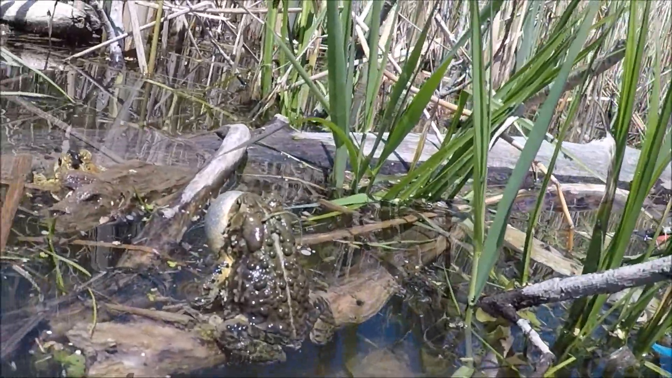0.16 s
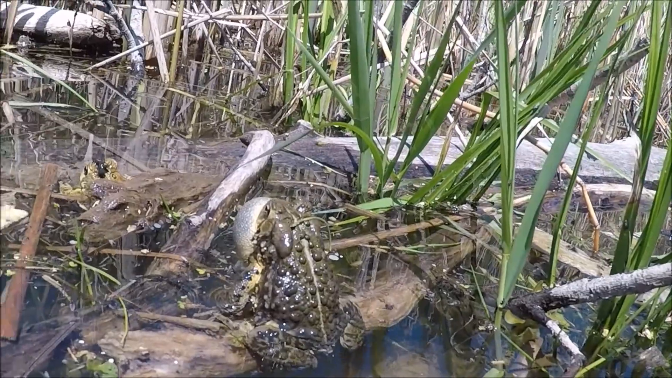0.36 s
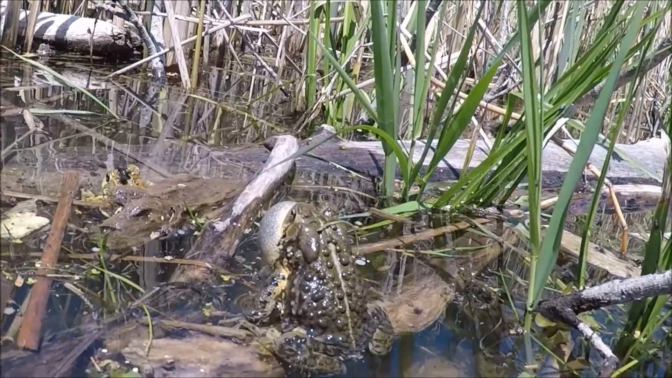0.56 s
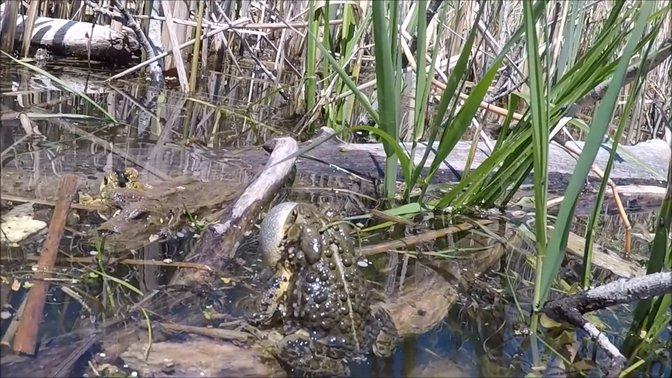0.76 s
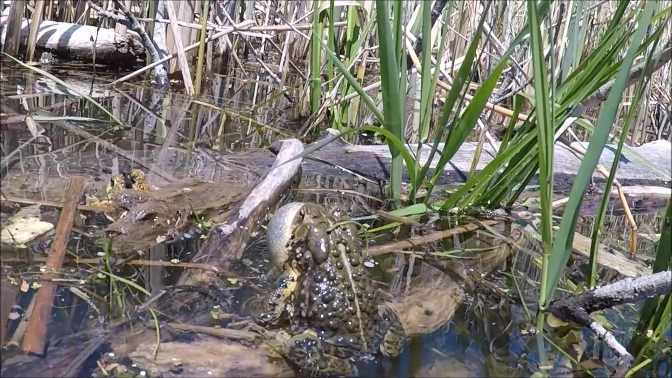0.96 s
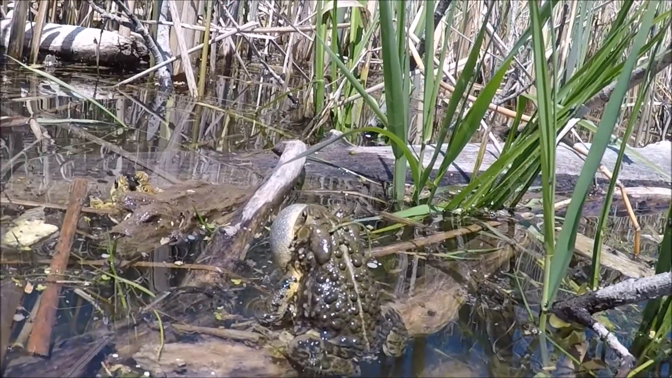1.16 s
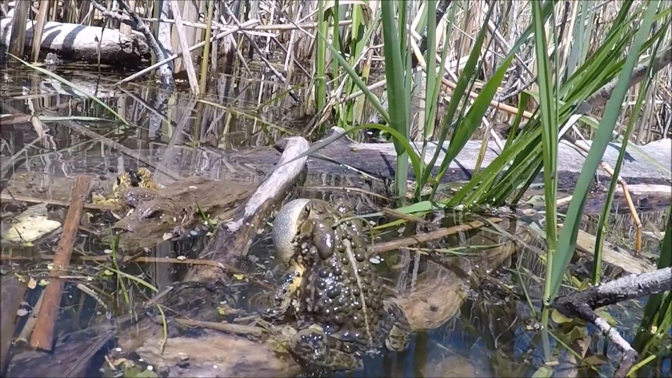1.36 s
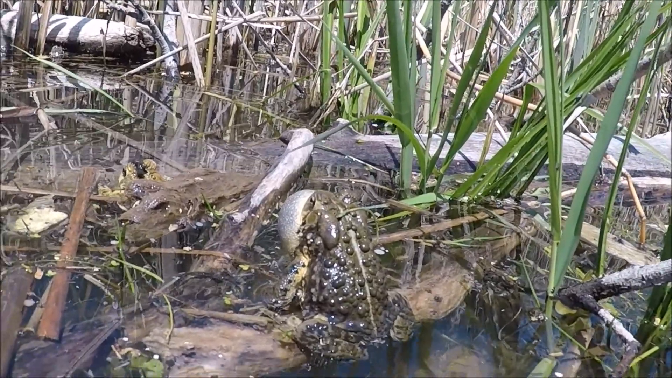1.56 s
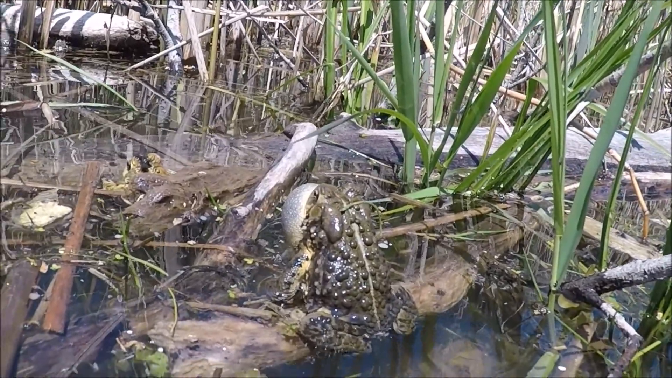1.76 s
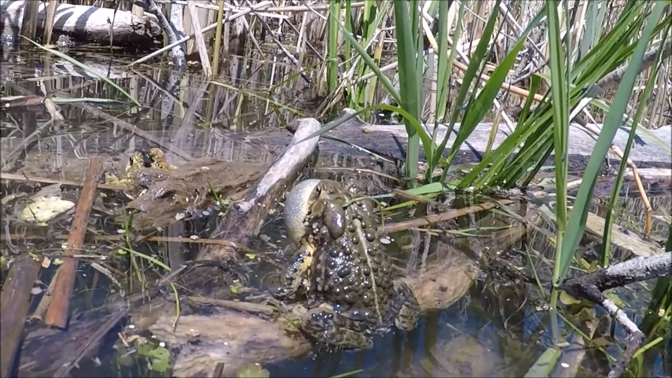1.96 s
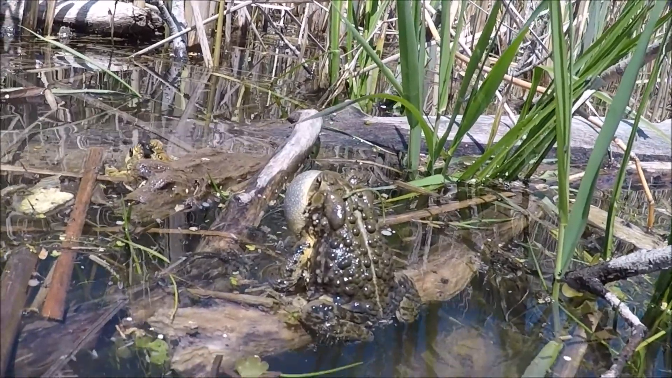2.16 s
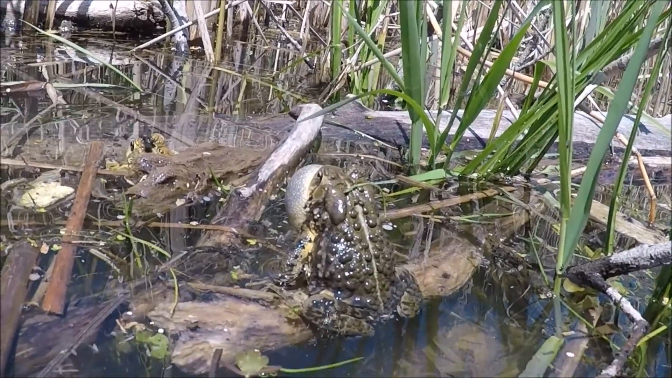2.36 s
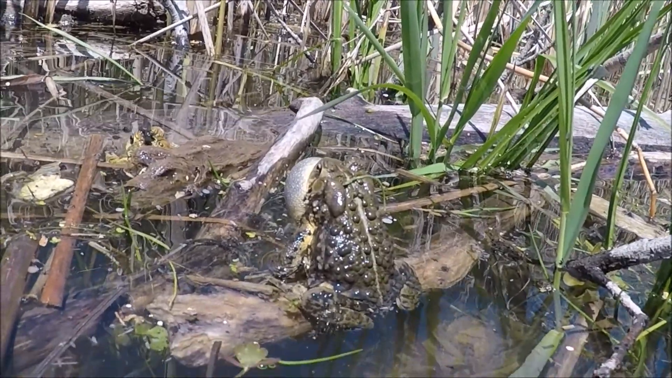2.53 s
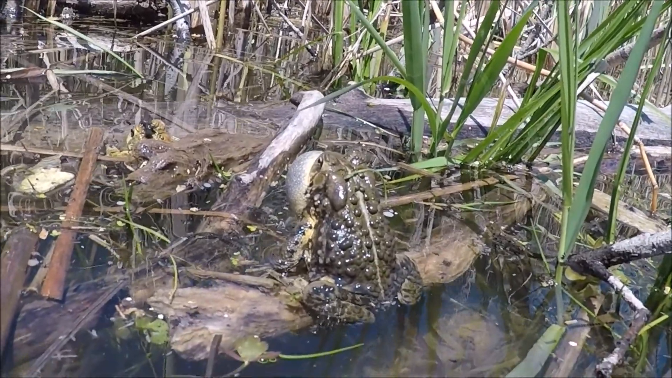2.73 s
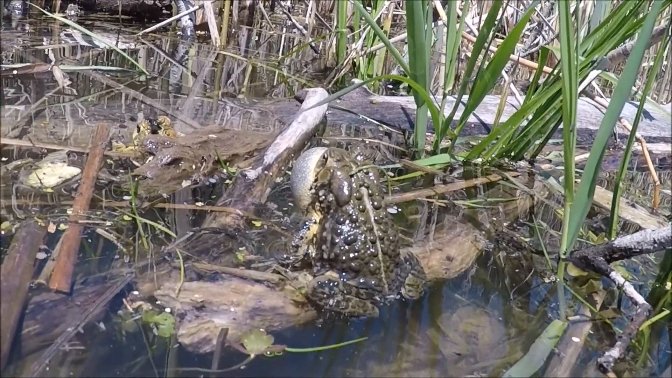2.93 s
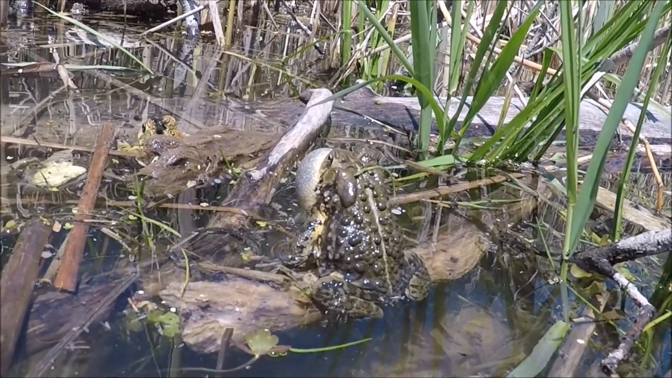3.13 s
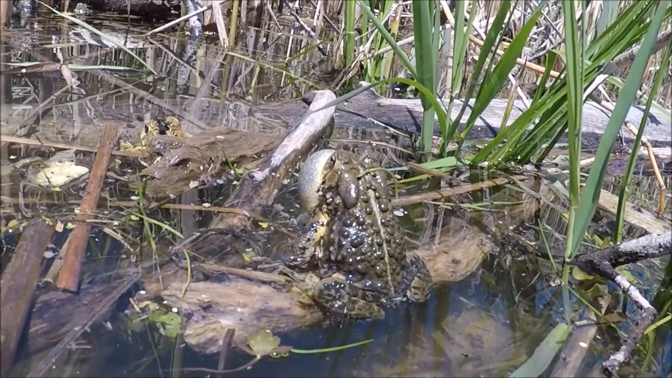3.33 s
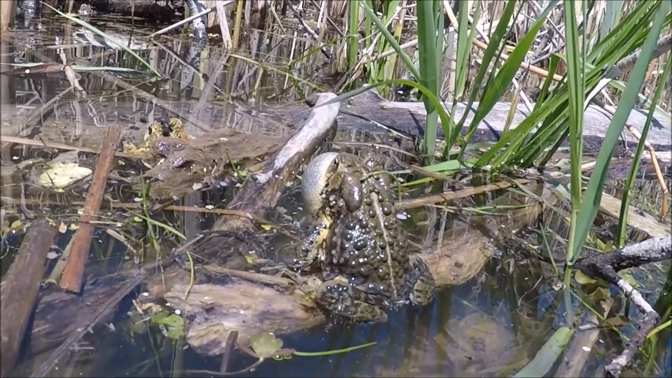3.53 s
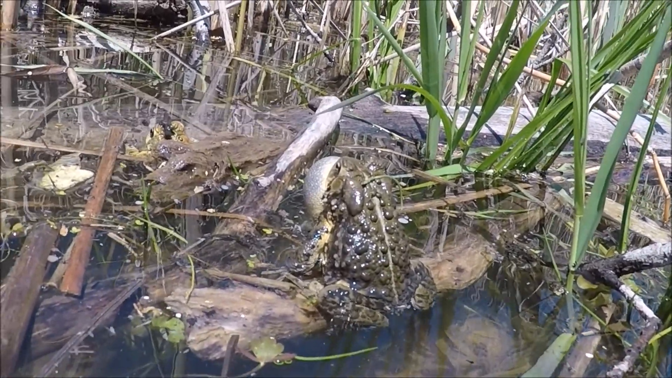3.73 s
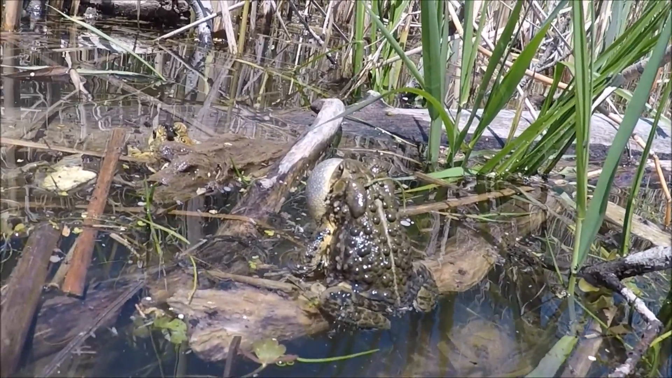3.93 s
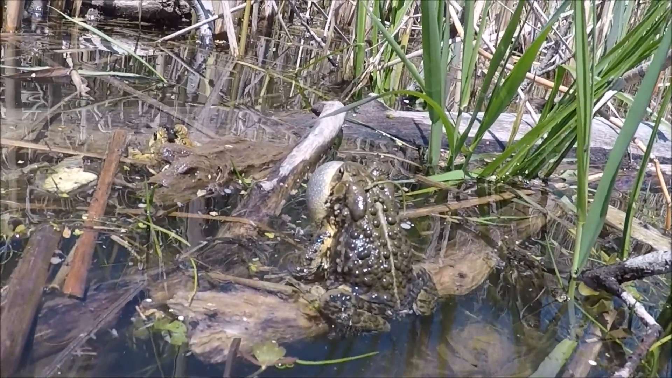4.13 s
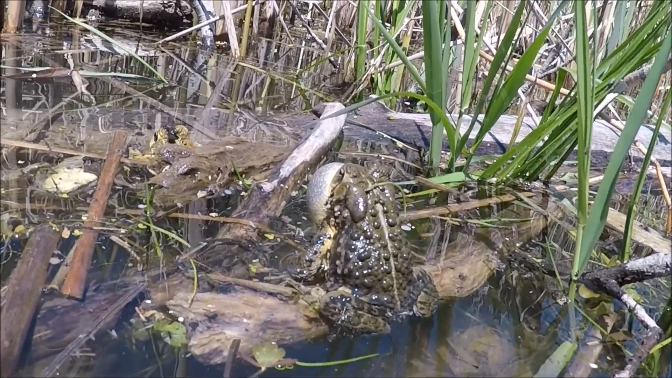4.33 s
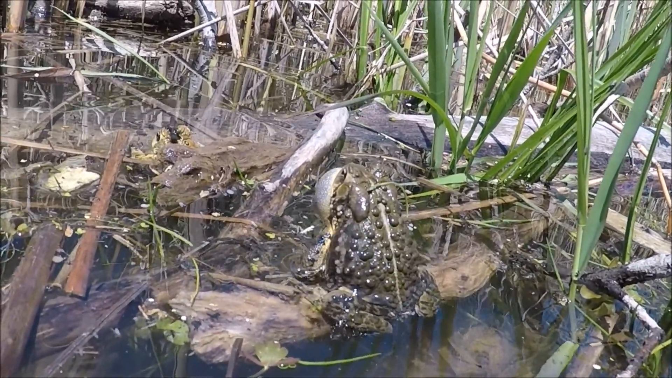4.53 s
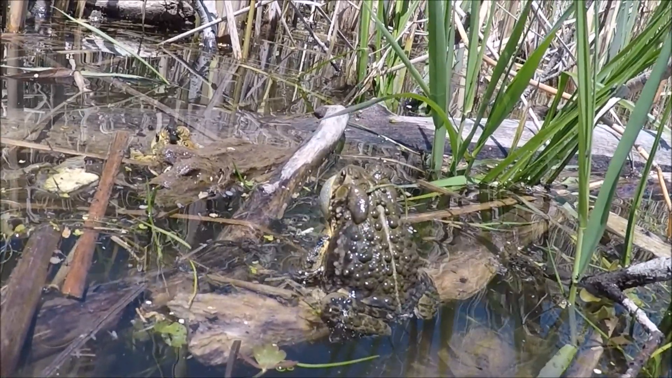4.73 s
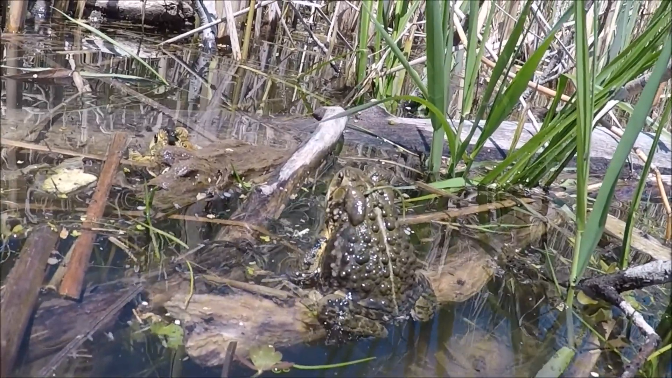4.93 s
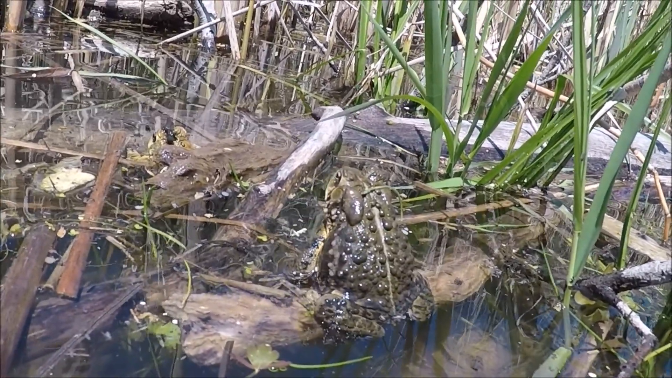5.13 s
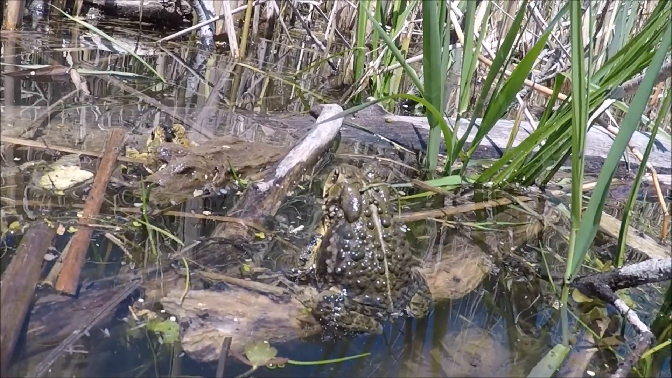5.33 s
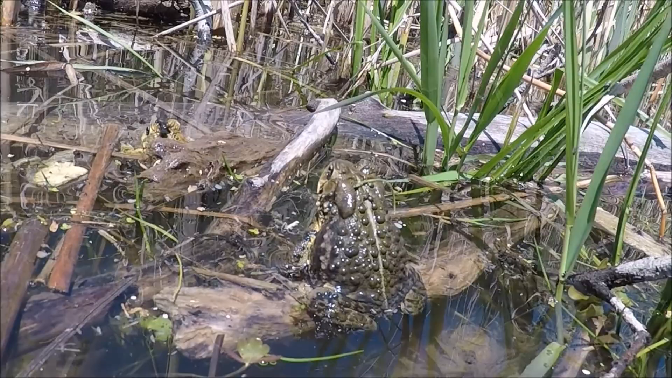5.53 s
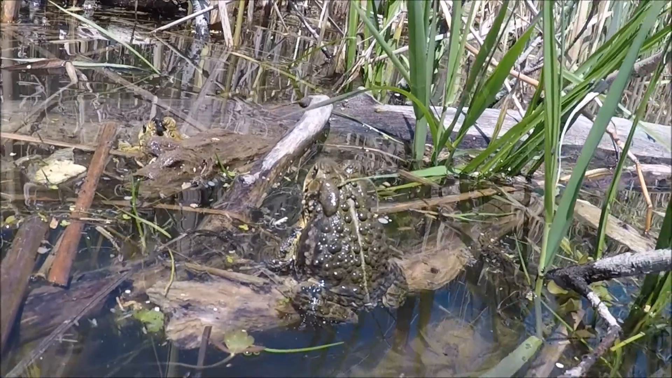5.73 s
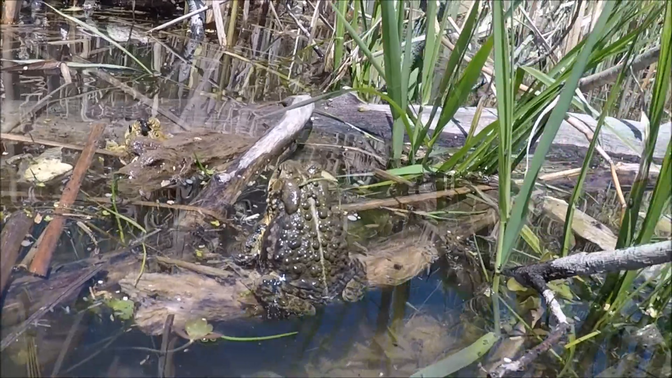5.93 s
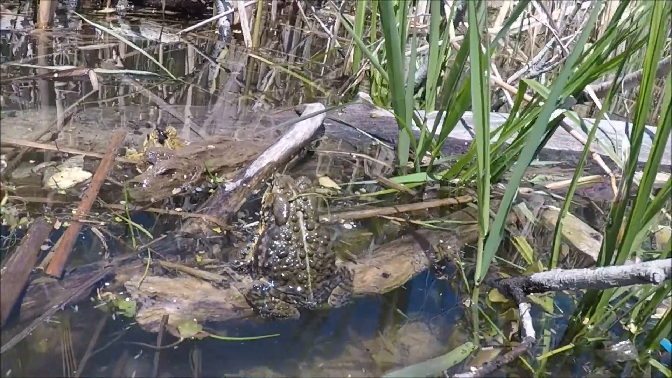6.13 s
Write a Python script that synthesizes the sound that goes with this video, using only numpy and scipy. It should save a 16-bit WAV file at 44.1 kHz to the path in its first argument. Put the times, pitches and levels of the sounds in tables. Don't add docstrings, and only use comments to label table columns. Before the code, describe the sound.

A toad trills loudly and steadily up close at a reedy pond, stops abruptly, and softer overlapping trills from neighbours swell behind amid wind knocks.

```python
import sys
import numpy as np
from scipy import signal
from scipy.fft import rfft, irfft, next_fast_len
from scipy.io import wavfile
from scipy.ndimage import uniform_filter1d, map_coordinates

SR = 44100
rng = np.random.default_rng(int(sys.argv[2]) if len(sys.argv) > 2 else 0)


def rack_gain(trim_db):
    fader = np.asarray(trim_db, float)
    return 10 ** (fader / 20)


def store_pcm(level_fs):
    pcm = np.round(np.clip(level_fs, -1, 1) * 32767).astype(np.int16)
    wavfile.write(sys.argv[1], SR, np.atleast_2d(pcm).T)


N = 276948

ROUND, FLAT = 1.04, .37
SILENT_S = 4.45


def unit(x):
    return x / np.sqrt(np.mean(x ** 2) + 1e-20)


def along(points, hz):
    f, v = np.transpose(points)
    return np.interp(np.log(hz + 1), np.log(f + 1), v)


def curves(rows):
    s, *cols = np.transpose(rows)
    return [np.interp(np.arange(N) / SR, s, c) for c in cols]


def wobble(rate):
    knots = rng.standard_normal(int(N * rate / SR) + 4)
    return map_coordinates(knots, [np.arange(N) * rate / SR])


def filtered(x, response):
    m = next_fast_len(N + SR // 2)
    return irfft(rfft(x, m) * response(np.fft.rfftfreq(m, 1 / SR)), m)[..., :N]


def rush(spectrum, alike, patchy_db):
    z = signal.stft(rng.standard_normal((2, N)), nperseg=512)[2]
    field = uniform_filter1d(rng.standard_normal(z.shape[1:]), size=6, axis=0)
    field = uniform_filter1d(field, size=10, axis=1)
    pair = signal.istft(z * rack_gain(patchy_db * unit(field)), nperseg=512)[1][:, :N]
    turn = np.arccos(np.clip(alike, -1, 1)) / 2
    coloured = filtered(pair, lambda hz: rack_gain(along(spectrum, hz) - 220 * (hz < spectrum[0][0])))
    mid, side = coloured * [[np.cos(turn)], [np.sin(turn)]]
    return unit(np.array([mid + side, mid - side]))


def placed(starts, shape, size):
    first = np.ceil(starts * SR).astype(int)[:, None] + np.arange(size)
    keep = (first >= 0) & (first < N)
    return np.bincount(first[keep], shape(first / SR - starts[:, None])[keep], N)


def reeds(x):
    # (frequency [Hz], 60 dB decay time [s])
    ring = [(500, 0.074), (1700, 0.15), (6000, 0.045)]
    hz, t, z = signal.stft(rng.standard_normal((2, SR // 4)), SR, nperseg=256)
    decay = rack_gain(-60 * t / along(ring, hz)[:, None])
    tail = signal.istft(z * decay, SR, nperseg=256)[1]
    tail = tail / np.linalg.norm(tail[0])
    return signal.fftconvolve(np.pad(x, (300, 0))[None], tail, axes=1)[:, :N]


def pulse(t, hz, length, overtones, fall):
    sag = .085
    hollow = .5
    part = np.clip(t / length, 0, 1)
    arch = np.sin(np.pi * part)
    turn = 2 * np.pi * hz * t
    sagging = 1 + sag * (.06 - part / 2)
    upper = 0
    for k, db, fade_db in overtones:
        level = rack_gain(db + fade_db * part) * (1 - hollow * (k == 2) * arch ** 4)
        upper = upper + level * np.sin(k * turn * sagging + k)
    return arch ** ROUND * np.sin(turn * (1 - fall * part / 2)) + arch ** FLAT * upper


def near_toad():
    # (time [s], pulse rate [per s])
    pace = [(0, 51.38), (0.3, 50.34), (0.9, 49.61), (1.6, 49.77), (2.3, 49.69), (2.9, 49.06), (3.3, 48.31),
            (3.6, 47.24), (3.85, 46.95), (4.1, 48.04), (4.25, 45.78), (4.32, 46.13), (4.36, 42.74),
            (4.45, 42.43)]
    # (multiple, left level [dB], right level [dB], fade over a puff [dB])
    overtones = [(2, -40, -31, 5), (3, -41, -36.5, -12), (4, -54, -38, -14), (5, -69, -56.5, -5.5),
                 (6, -70, -65.5, -12.5), (7, -79.5, -58.5, -3.5)]
    # (delay [ms], level [dB])
    water = [
        [(2.396, -17), (8.12, -24.5)],
        [(4.98, -6.7), (9.122, -17.5)],
    ]
    # (frequency [Hz], level [dB per Hz])
    breath = [(1800, -35.5), (2700, 3.5), (3800, -3.5), (4400, 0), (5500, -16.5), (7200, -6), (8300, -28),
              (10000, -42.5), (12500, -66.5)]
    puff_s = .0108
    first_s, jitter_s = -.0005, .0002
    rest_db, swing_db, settle_s = 5, 4.5, 0.18

    beats = np.cumsum(curves(pace)[0]) / SR
    count = np.arange(int(beats[round(SILENT_S * SR)]) + 1)
    chance = rng.standard_normal((len(count), 4))
    starts = np.interp(count, beats, np.arange(N) / SR) + first_s + jitter_s * chance[:, 0]
    level_db = 0.068 * chance[:, 1]
    pan_db = rest_db + swing_db * np.exp(-starts / settle_s) + 0.27 * chance[:, 3]
    hz = 1619 + 4 * chance[:, 2:3]
    air = rush(breath, alike=0.048, patchy_db=2.5)

    def breath_gate(t):
        return np.sin(np.pi * np.clip(t / puff_s, 0, 1)) ** FLAT * rack_gain(-5 * t / puff_s)

    def pop(t):
        return np.sin(2 * np.pi * 1050 * t) * rack_gain(-60 * t / 0.0076) * np.clip(t / 0.0015, 0, 1)

    ears = []
    # voice, opening pop, shutting pop, air [dB]
    levels = [(-5.5, -22, -40.0, -55), (-9.0, -16.5, -25.5, -49)]
    for ear, (voice_db, open_db, shut_db, air_db) in enumerate(levels):
        size = rack_gain(level_db + voice_db - ear * pan_db)[:, None]
        tones = [(row[0], row[1 + ear], row[-1]) for row in overtones]
        voice = placed(starts, lambda t: size * pulse(t, hz, puff_s, tones, fall=0.049), size=640)
        voice = voice + rack_gain(air_db) * placed(starts, breath_gate, size=640) * air[ear]
        pops = rack_gain(open_db) * placed(starts - .0008, pop, size=512)
        pops = pops + rack_gain(shut_db) * placed(starts + puff_s, pop, size=512)

        def echo(f):
            bounces = sum(rack_gain(db) * np.exp(-2j * np.pi * f * ms / 1000) for ms, db in water[ear])
            return 1 + bounces / (1 + (f / 8000) ** 4)

        ears.append(filtered(voice, echo) + filtered(pops, lambda f: 1 / (1 + (740 / (f + 1)) ** 6)))
    return np.array(ears) + rack_gain(-30.5) * reeds(ears[0])


def neighbours():
    # (pitch [Hz], pulse [ms], one pulse centre [s], left-right [dB], left lead [ms], octave [dB])
    toads = [
        (1795, 8, 5.104, 9.5, .32, -26),
        (1690, 9.5, 5.272, 6, .31, -35),
        (1570, 9.5, 5.2, 5, .31, -30),
    ]
    # (time [s], pulse rate of each toad in turn [per s] x 3)
    paces = [(4.5, 56.3, 52.4, 60), (5, 55.7, 51.8, 58), (5.25, 55.6, 52.5, 55.9), (5.7, 55.4, 53, 54.9),
             (6.2, 55.2, 53.5, 53.4)]
    # (level [dB], swell [dB])
    voices = [
        (-39, 5.5),
        (-42.5, 3),
        (-43.5, 8),
    ]
    swell_s, swell_lasts, scatter_db = 4.45, .5, .9

    out = np.zeros((2, N))
    swell = np.clip((np.arange(N) / SR - swell_s) / swell_lasts, 0, 1)
    for toad, rate, (level_db, swell_db) in zip(toads, curves(paces), voices):
        hz, ms, centre, pan_db, lead, octave_db = toad
        beats = np.cumsum(rate) / SR
        beats = beats - beats[round(centre * SR)]
        chance = rng.standard_normal((512, 3))[:int(beats[-1] - beats[0])]
        count = np.ceil(beats[0]) + np.arange(len(chance))
        centres = np.interp(count, beats, np.arange(N) / SR)
        starts = centres + .0003 * chance[:, 0] - ms / 2000
        tones = [(1.985, octave_db, -26.5), (3, octave_db - 24.5, -6), (4, octave_db - 24.5, -7.5)]
        size = rack_gain(scatter_db * chance[:, 1:2])
        pitch = hz + 12 * chance[:, 2:]
        train = placed(starts, lambda t: size * pulse(t, pitch, ms / 1000, tones, fall=0.056), size=512)
        voice = unit(train) * rack_gain(level_db + swell_db * swell)
        late = filtered(voice, lambda f: rack_gain(-pan_db) * np.exp(-2j * np.pi * f * lead / 1000))
        out += rack_gain(5) * np.array([voice, late]) + rack_gain(-16) * reeds(voice)
    return out


def pond():
    # (frequency [Hz], level [dB per Hz])
    bed = [(380, -39.5), (690, -38.5), (870, -33.5), (1090, -25), (1340, -18.5), (1620, -22), (1860, -27.5),
           (2070, -49), (2510, -40.5), (3400, -36), (3900, -58), (4350, -47.5), (8000, -53.5),
           (12500, -65.5), (13600, -110)]
    return rack_gain(-45.5 + 0.55 * wobble(6)) * rush(bed, alike=-0.27, patchy_db=-2.0)


def wind():
    # (time [s], level [dB])
    gusts = [(0, -36), (1, -39.5), (2.3, -40.5), (2.6, -43.5), (3.4, -45.5), (4.3, -48.5), (4.8, -56.5),
             (5.3, -45.5), (5.8, -44), (6.28, -39)]
    # (frequency [Hz], level [dB per Hz])
    buffet_tone = [(8, -25.5), (20, -0.5), (45, -2), (80, -9), (140, -42), (300, -120)]
    # (frequency [Hz], level [dB per Hz])
    rumble_tone = [(47, -28.5), (80, 4), (178, -0.5), (204, -6.5), (453, -22), (700, -63.5), (910, -58),
                   (1540, -120)]
    # (time [s], level [dB])
    engine = [(0, -37), (1.3, -42.5), (2.6, -46), (4.3, -47.5), (5.1, -45), (5.6, -42.5), (6.28, -44.5)]
    # (multiple, level [dB])
    harmonics = [(2, -8), (3, -18), (4, -25.5)]
    calm_db, base_db, grows = -46, -46.5, .3

    buffet_db, = curves(gusts)
    lumps = rack_gain(3.1 * np.array([wobble(10.0), wobble(7.2)]))
    buffet = unit(lumps * rush(buffet_tone, alike=-0.1, patchy_db=-0.5))
    buffet = rack_gain(buffet_db + 7) * buffet * rack_gain([[-2], [1.5]])

    rumble_db = base_db + grows * (buffet_db - calm_db)
    rumble = rack_gain(rumble_db + 2.0 + 0.64 * wobble(22))
    rumble = rumble * rush(rumble_tone, alike=0.0047, patchy_db=2.0)

    hum_db, = curves(engine)
    turn = 2 * np.pi * np.cumsum(85.45 + 1.2 * wobble(4.6)) / SR
    partials = [(1, 0)] + list(harmonics)
    hum = np.sqrt(2) * sum(rack_gain(db + 0.91 * wobble(3.5)) * np.sin(k * turn) for k, db in partials)
    return buffet + rack_gain([[-2.5], [1.5]]) * rumble + rack_gain(hum_db) * hum


def knocks():
    # (time [s], pitch [Hz], left level [dB], right level [dB], push 1 or pull -1)
    puffs = [(0.034, 202.6, -11.5, -2, -1), (0.103, 175.3, -13, -4.5, -1), (0.147, 103, -17, -28, 1),
             (0.364, 139.3, -16, -4, -1), (0.496, 115, -19, -25, 1), (1.462, 98, -30, -15, -1),
             (1.665, 98, -21, -25, -1), (2.379, 103.8, -11.5, -11, -1), (3.145, 100.8, -24, -20, 1),
             (3.978, 141, -26, -15.5, -1), (4.34, 117, -16, -23, -1), (5.181, 131, -16.5, -18.5, 1),
             (5.366, 113, -19, -23, -1), (5.482, 119, -13, -21.5, -1), (5.912, 148, -18, -9.5, 1),
             (5.917, 112.3, -37, -4, 1), (5.931, 59.7, -8.5, -28, 1), (6.041, 98, -8.5, -0.5, -1),
             (6.139, 126, -10, -3.5, 1), (6.264, 97.8, -9, -2.5, 1)]
    s, hz, left_db, right_db, sign = np.transpose(puffs)[..., None]

    def swing(t):
        turns = t * hz
        push = np.clip(turns / .25, 0, 1)
        return np.sin(2 * np.pi * turns ** .7) * push * np.exp(-.6 * turns ** 1.3)

    starts = (s - .3 / hz)[:, 0]
    sweep = ((left_db > right_db - 6) / hz / 4)[:, 0]
    ports = []
    for side, db, at in [(-0.67, left_db, starts - sweep), (0.8, right_db, starts)]:
        size = side * np.sign(sign) * rack_gain(db + 2.0)
        ports.append(placed(at, lambda t: size * swing(t), size=2048))
    return np.array(ports)


def scrape():
    # (level [dB], resonance from [Hz], to [Hz])
    top_db, from_hz, to_hz = (-48, 7100, 6300)
    # (start [s], end [s])
    start, end = (5.67, 5.89)
    # (time [s], peak level [dB], pitch [Hz], left-right [dB])
    touches = [(.03, -47, 7160, -3), (.08, -48, 8000, -10), (4.455, -38, 2370, 2.5), (5.513, -44, 6070, 1),
               (5.567, -42, 5760, -8), (5.71, -35, 2800, 8), (5.722, -30, 2880, 7), (5.919, -36, 6170, 3),
               (5.921, -40, 4900, 9), (5.917, -43, 7450, 3), (5.919, -19, 740, -3.5),
               (6.269, -42, 5900, -8), (6.27, -48, 8800, -8)]
    in_s, out_s, fade_db = .015, .04, 4

    t = np.arange(N) / SR
    part = np.clip((t - start) / (end - start), 0, 1)
    on = np.clip(np.minimum((t - start) / in_s, (end - t) / out_s), 0, 1)
    level_db = top_db - fade_db * part
    hz = from_hz + (to_hz - from_hz) * np.sqrt(part)
    slow = unit(filtered(rng.standard_normal((2, N)), lambda f: 1 / (1 + (f / 280) ** 2)))
    narrow = slow * np.sin(2 * np.pi * np.cumsum(hz) / SR)
    hiss = [(2000, -20), (4500, -4), (8000, 0), (11000, -9), (13000, -14), (14000, -70)]  # (Hz, dB)
    wide = rush(hiss, alike=.4, patchy_db=1.5)

    s, db, tick_hz, pan_db = np.transpose(touches)[..., None]

    def tick(t, side):
        ring = np.sin(2 * np.pi * tick_hz * t) * rack_gain(-60 * t / .011)
        return rack_gain(db + side * pan_db / 2) * ring * np.clip(t / 0.00033, 0, 1)

    ticks = [placed(s[:, 0], lambda t: tick(t, side), size=1024) for side in (1, -1)]
    return on * rack_gain(level_db + 2 * wobble(30)) * (narrow + rack_gain(-5) * wide) + ticks


def lift():
    jump_db, jump_s = 3, 0.022
    lift_db, lift_s = 11.5, 1
    duck_at, duck_db, duck_s = 5.92, 1.5, .1
    t = np.arange(N) / SR

    def rise(start, tau):
        return 1 - np.exp(-np.clip(t - start, 0, None) / tau)

    recovery_db = jump_db * rise(SILENT_S, jump_s) + lift_db * rise(SILENT_S, lift_s)
    return rack_gain(recovery_db - duck_db * rise(duck_at, duck_s))


def scene():
    behind = neighbours() + pond() + wind()
    return near_toad() + lift() * behind + knocks() + scrape()


def top_cut(x):
    return signal.sosfilt(signal.butter(12, 18300, fs=SR, output="sos"), x)


def record(dry):
    soft = dry / (1 + np.abs(dry / .85) ** 8) ** (1 / 8)
    return top_cut(soft)


dry = scene()
out = record(dry)
store_pcm(out)
```